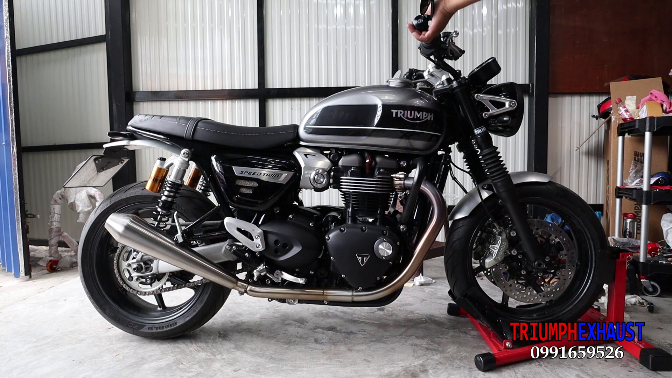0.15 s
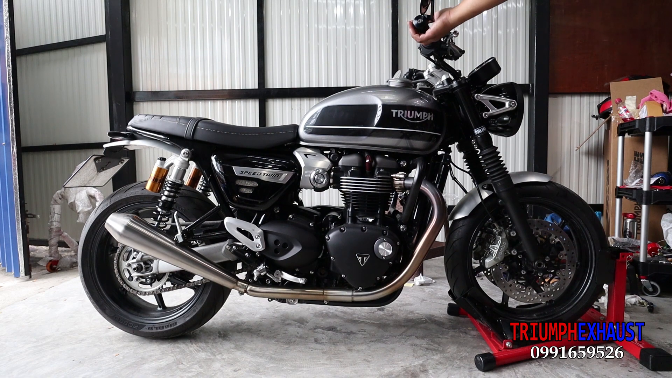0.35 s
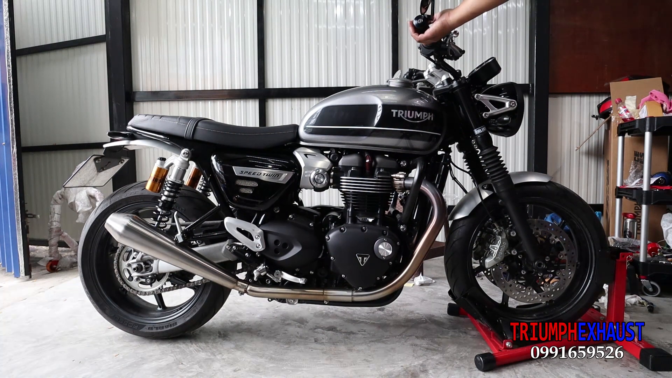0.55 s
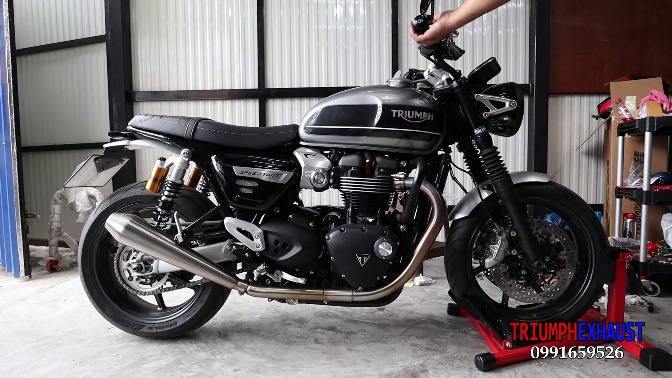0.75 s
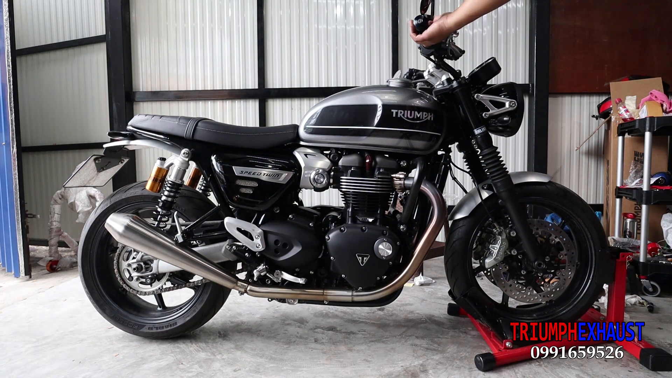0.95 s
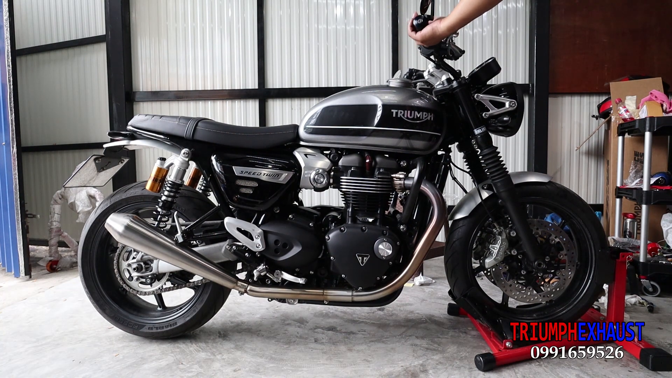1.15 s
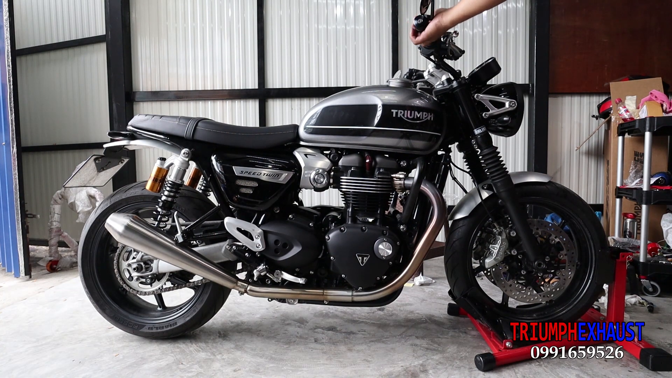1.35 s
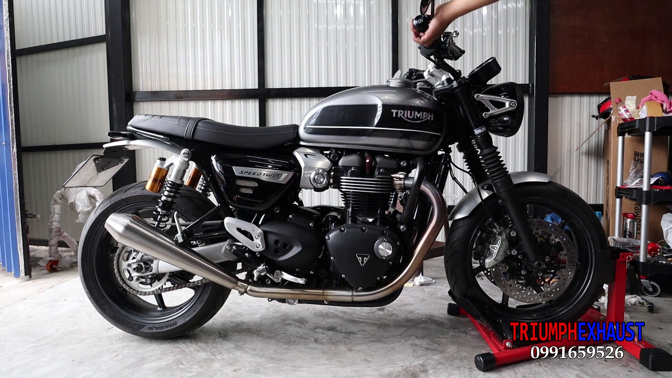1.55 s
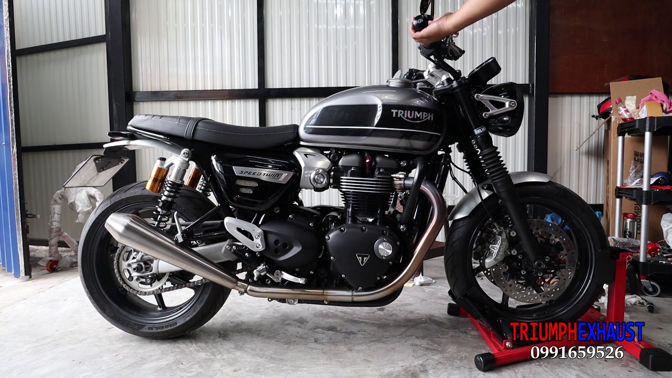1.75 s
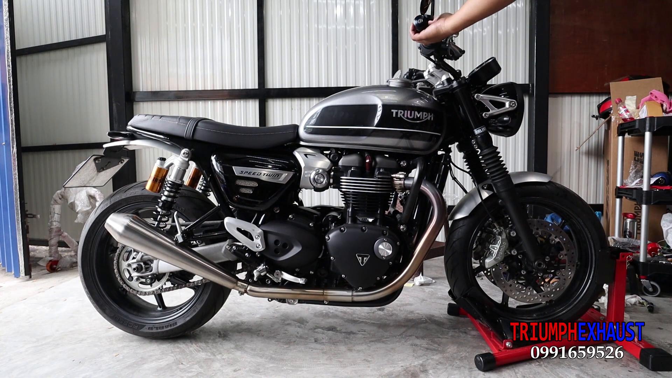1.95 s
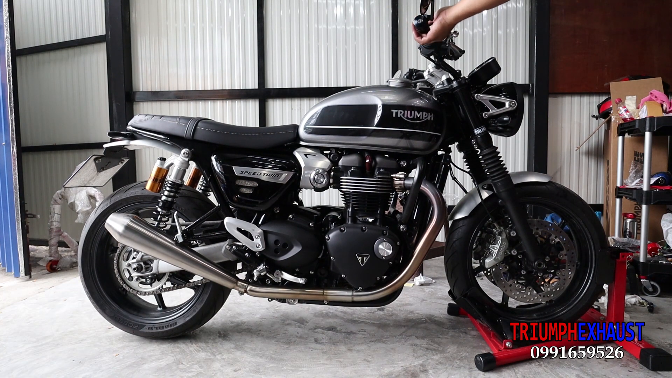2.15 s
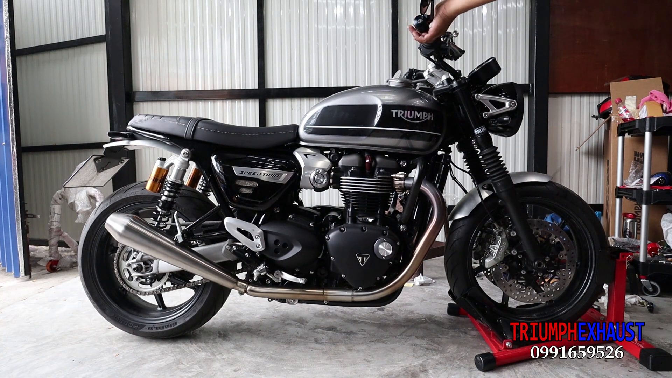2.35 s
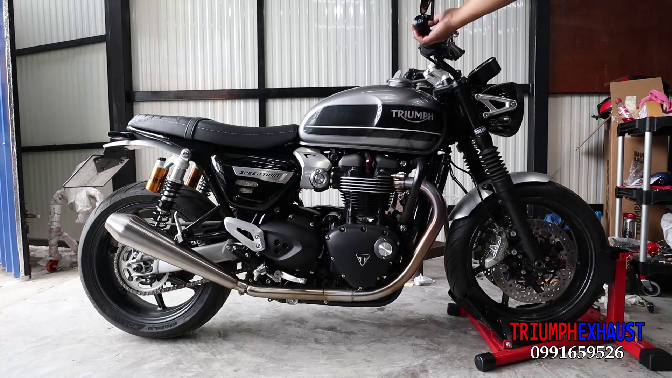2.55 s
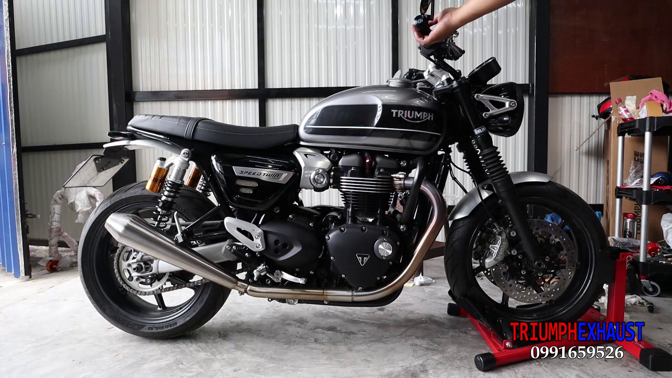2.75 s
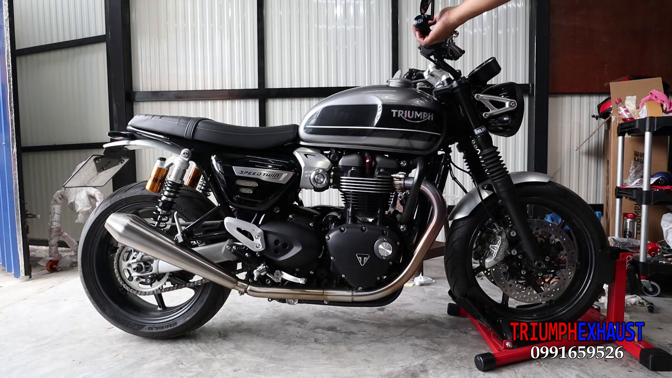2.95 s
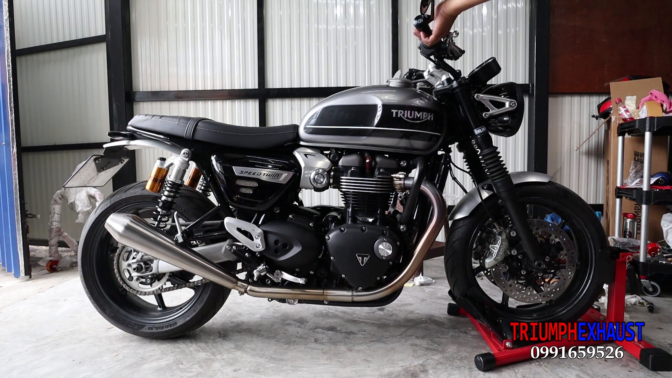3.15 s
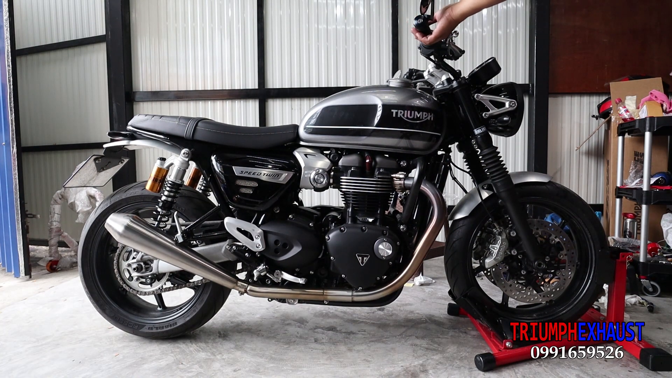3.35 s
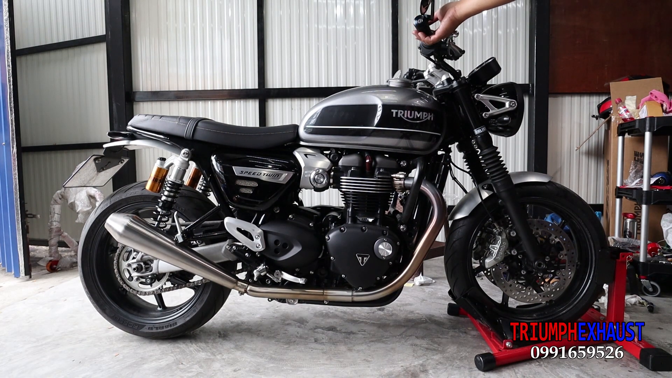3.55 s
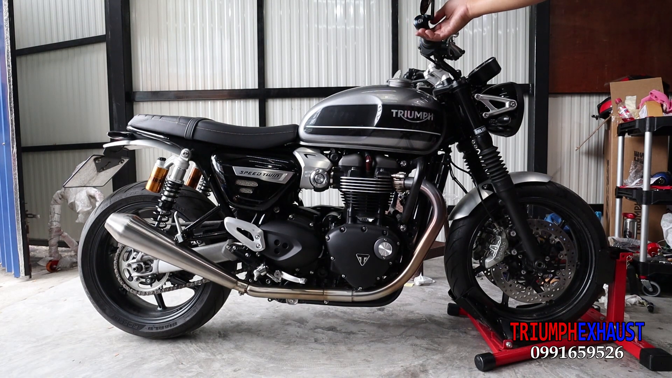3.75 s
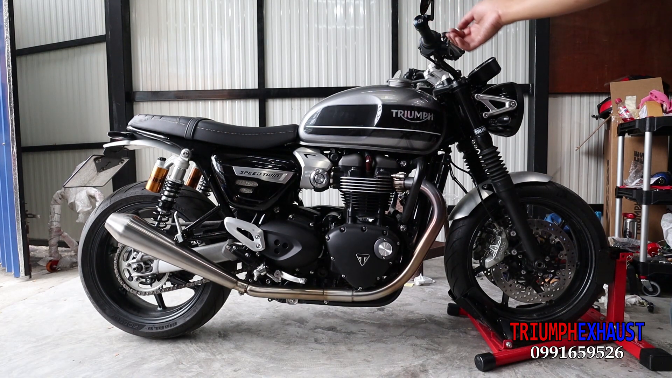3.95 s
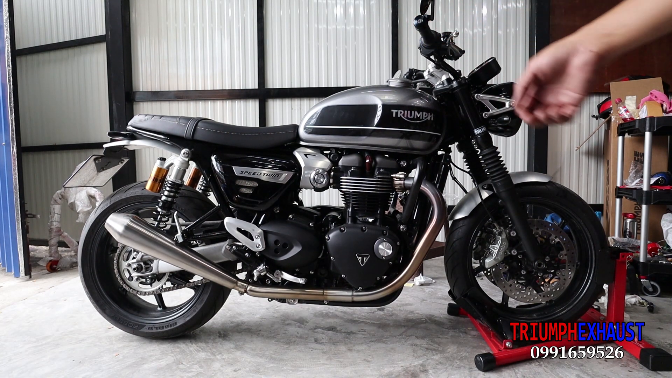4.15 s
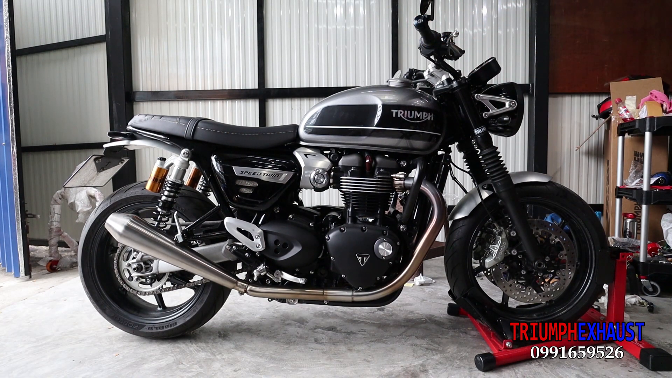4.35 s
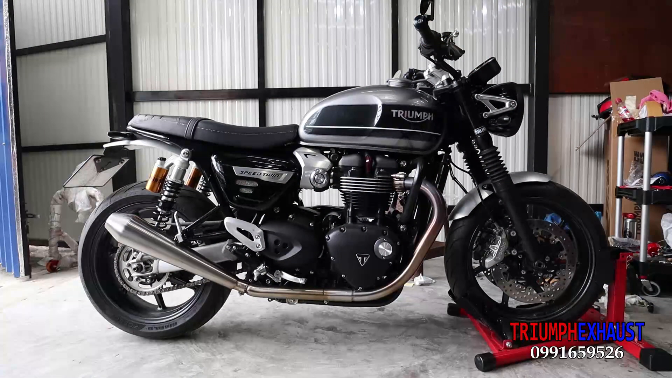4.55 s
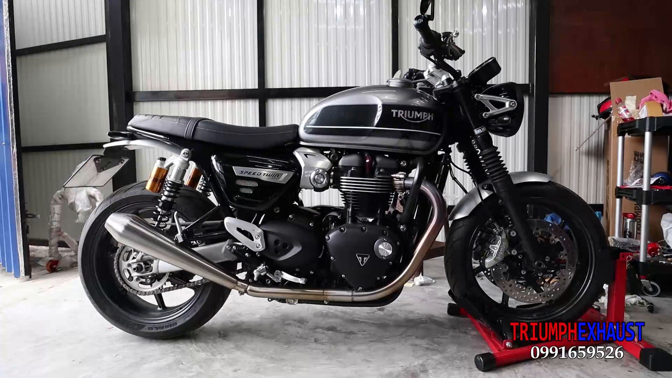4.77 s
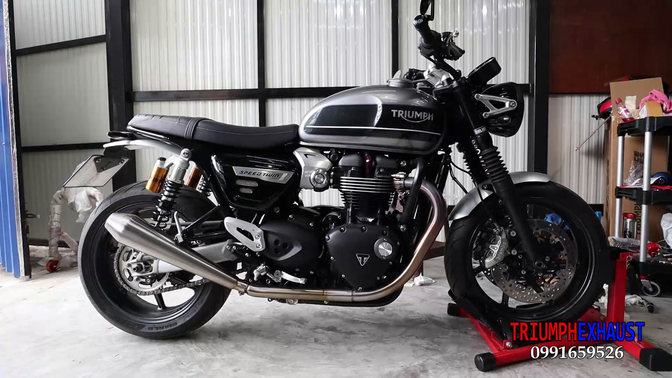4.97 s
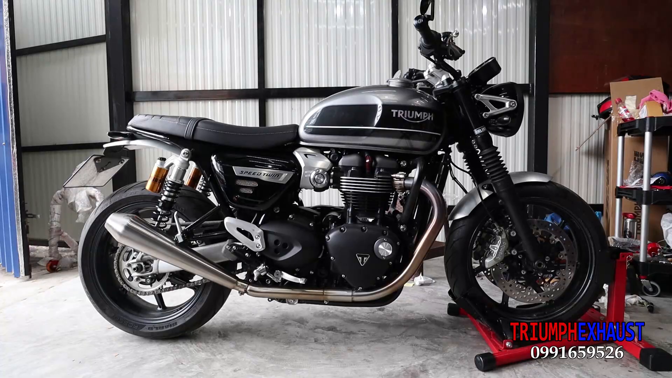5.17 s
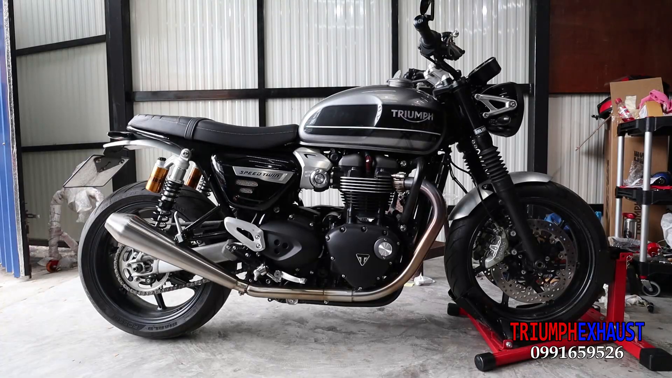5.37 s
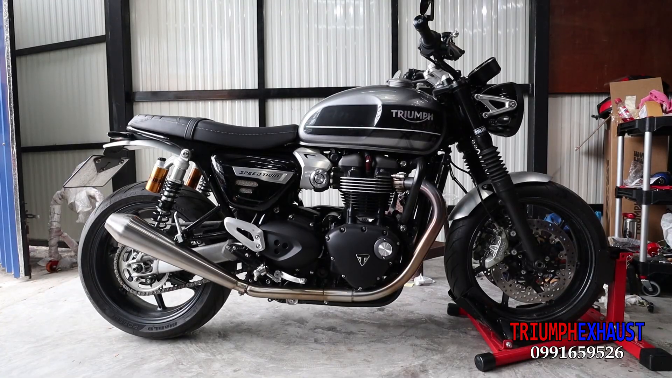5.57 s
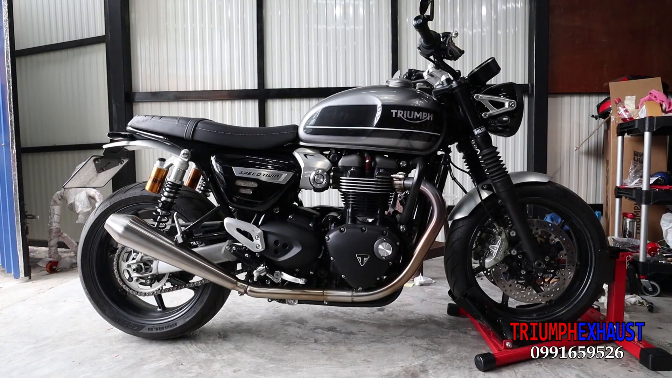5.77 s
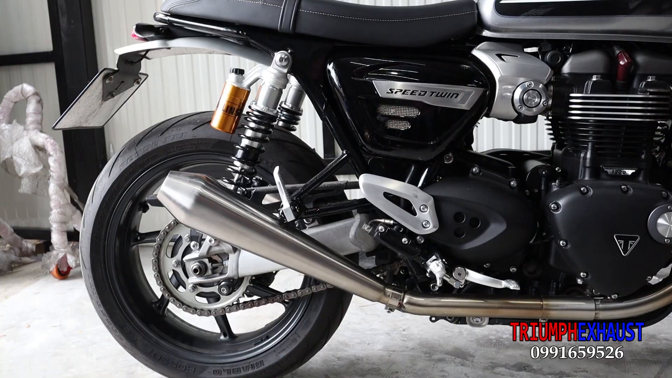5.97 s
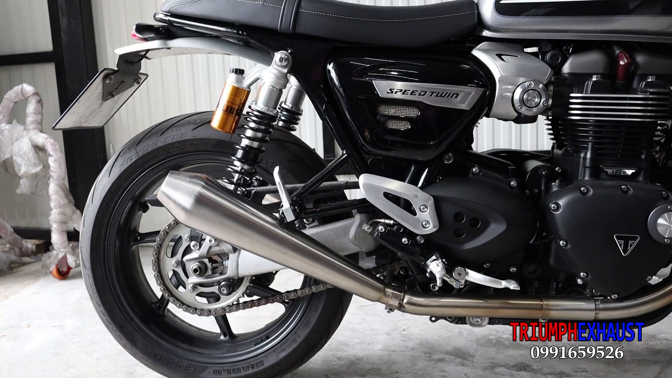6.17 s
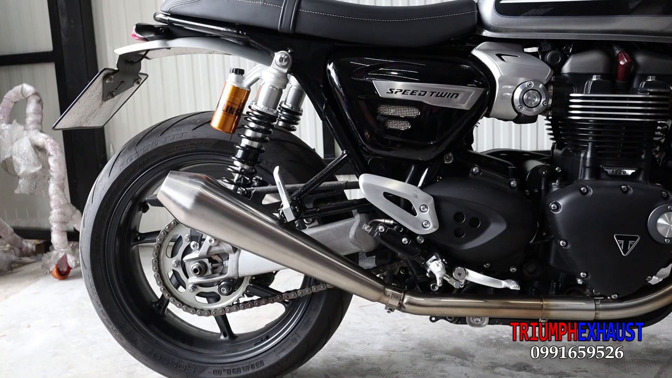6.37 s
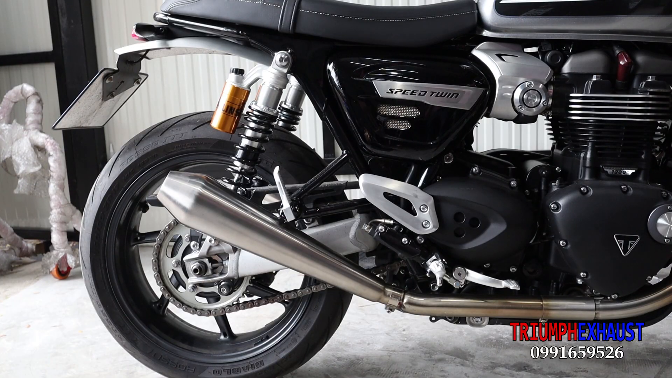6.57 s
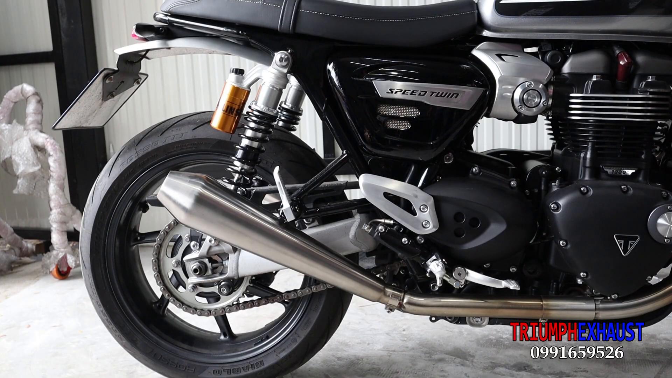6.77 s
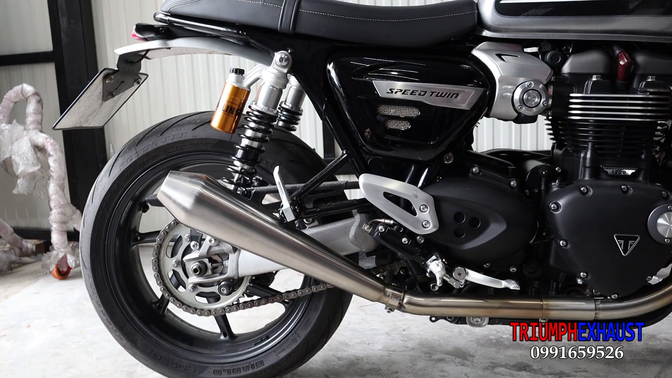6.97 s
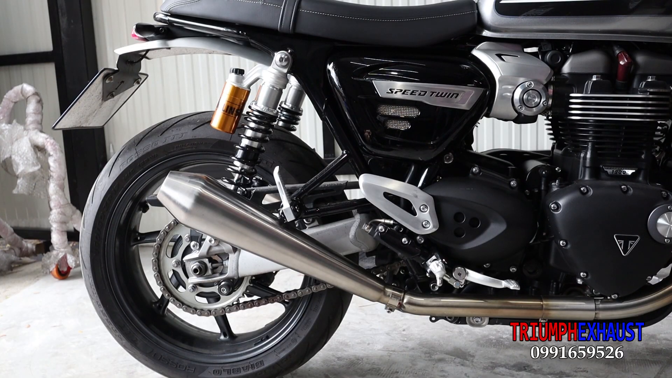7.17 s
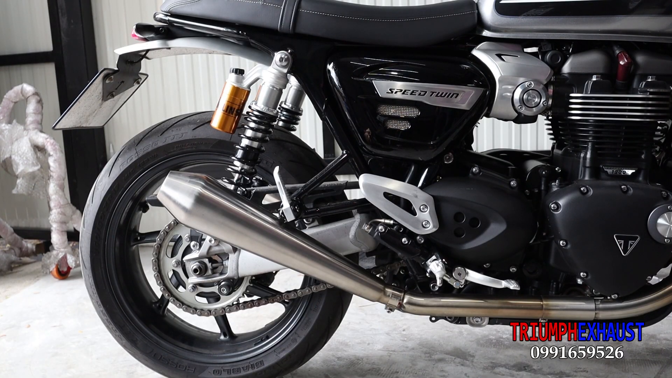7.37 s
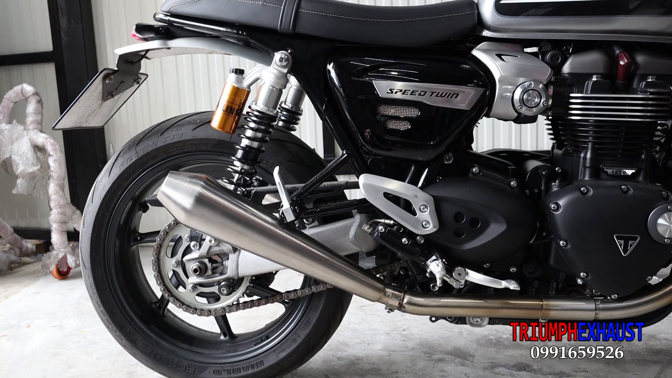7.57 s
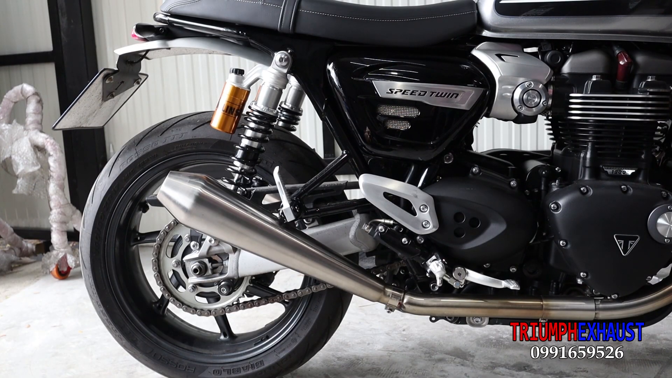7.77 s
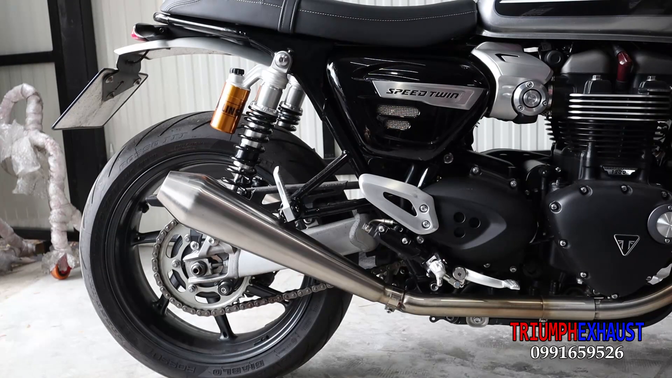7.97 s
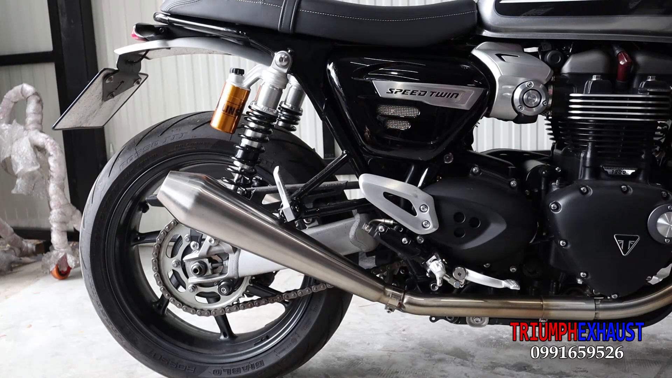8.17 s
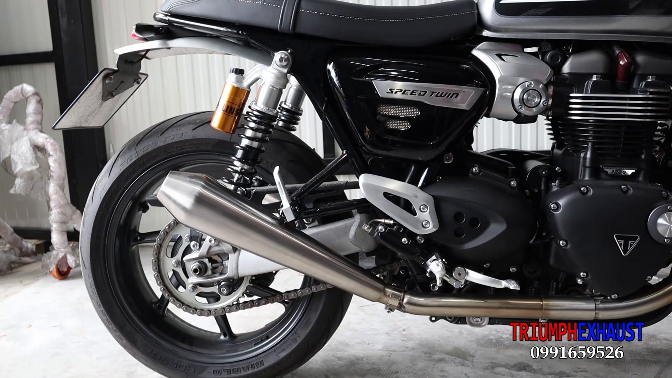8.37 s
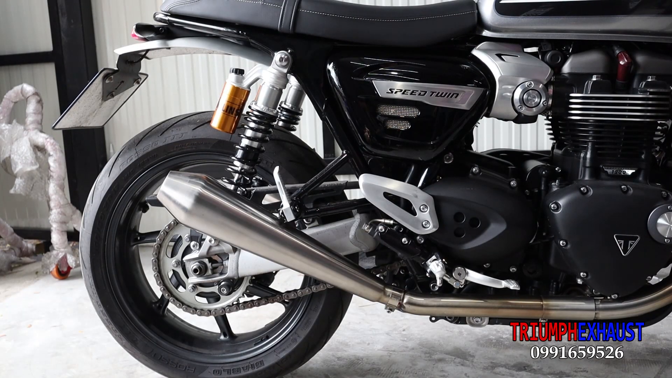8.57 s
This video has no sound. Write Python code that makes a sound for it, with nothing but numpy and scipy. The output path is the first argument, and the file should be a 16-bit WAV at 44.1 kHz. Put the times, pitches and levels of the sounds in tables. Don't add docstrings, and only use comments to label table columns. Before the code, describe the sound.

A parallel-twin motorcycle runs in a small sheet-metal workshop, dry but with a short tinny echo. It starts mid-rev, a deep, offbeat, gritty bark climbing until 0.3 s, then the throttle shuts and pitch falls; two very sharp exhaust cracks snap close together at 0.6 s, with another bang at 0.9. Further blips come at about 1.5, 2.25 and 3.15 s, each a quick rise and burbling fall, with dull pops near 2.0, 2.2, 2.95 and 3.7. From about 4.2 s it settles into a lumpy, hunting idle, stumbling briefly at 4.4, with valve clatter and a thin steady pump whine. At 5.85 s comes a blink of silence, then a closer, louder tail-pipe view: slow uneven thumping, rattling metal and clearer whine. A final blip barks from 7.7 to 8.0 s, then falls with low pops at 8.3 and 8.57, ending abruptly.

```python
import sys
import numpy as np
from scipy import signal
from scipy.fft import rfft, irfft, next_fast_len
from scipy.io import wavfile
from scipy.ndimage import uniform_filter1d

SR = 44100
rng = np.random.default_rng(int(sys.argv[2]) if len(sys.argv) > 2 else 0)


def to_linear_factor(level_db):
    exponent = np.asarray(level_db, float) / 20
    return 10 ** exponent


def generate_wav(sig):
    pcm = np.round(np.clip(np.atleast_2d(sig).T, -1, 1) * 32767).astype(np.int16)
    wavfile.write(sys.argv[1], SR, pcm)


N = 380141
T = np.arange(N) / SR

# silence_start_s, new_place_s, sound_returns_s
SCENE_CHANGE_S = (5.8405, 5.86, 5.8806)
# open_s, shut_s, pull (share of full)
TWISTS = [
    (-.085, .291, .948),
    (1.431, 1.791, .593),
    (2.22, 2.549, .684),
    (3.152, 3.3865, 1.042),
    (7.6, 8.007, .856),
]
# time_s, speed (four-stroke cycles/s)
IDLE = [(4.25, 9.51), (4.9, 9.08), (5.2, 9.34), (5.6, 8.17), (5.86, 8.96), (6.05, 8.08), (6.25, 7.66),
        (6.55, 8.62), (6.9, 8.48), (7.4, 8.76), (7.65, 7.76)]
# first_s, last_s, charge (0-1), thump_db, rush_db
BLIPS = [
    (.0, 0.296, 0.98, -13, -46.5),
    (1.499, 1.711, 0.77, -12.5, -35),
    (2.274, 2.51, 0.69, -12, -35.5),
    (3.171, 3.406, 0.66, -13.5, -37),
    (7.691, 7.954, 0.74, -18, -37.5),
]
# time_s, gain_db
GAIN = [(0, 4.5), (.2, 1), (.6, 4), (.85, -0.1), (1.4, 2.8), (1.6, 2.5), (2.3, 5.5), (2.5, 2.5), (3.2, 6),
        (3.4, 3), (4.3, 10), (5.84, 17), (5.88, 22), (7.725, 20.5), (7.77, 10.5), (7.95, 9.5), (8.2, 11.5),
        (8.62, 11)]
# pitch_hz, width_hz, gain (signed)
SHOCK_MODES = [(152.1, 25.4, 0.8), (128, 24, 0.067), (59.3, 26, -0.023), (199, 58, -0.046),
               (269.4, 27, -0.15), (312, 15, 0.088), (400.4, 17.3, -0.064), (491.4, 28, 0.046),
               (563.4, 42, -0.081), (664, 86, 0.15), (865, 85, -0.18)]
# pitch_hz, width_hz, gain (signed)
SUCTION_MODES = [(54.7, 17.6, -0.6), (121.3, 15, 0.53), (148.7, 26, 0.4), (169.4, 35.7, -0.54),
                 (262, 33.3, -0.11), (400.7, 28, 0.048), (540, 51, -0.049)]
# pitch_hz, width_hz, gain (signed)
PIPE_MODES = [(50.8, 21, -0.21), (237, 33, 0.098), (414, 90, 0.077)]
# delay_ms, gain (signed)
REFLECTIONS = [
    (0, 1),
    (9.9, -.82),
    (14.3, -.65),
    (33.3, .275),
]
# pitch_hz, level_db (per Hz)
RUSH = [(180, 0.5), (300, -7.5), (448, -10), (488, -9.5), (847, -9.5), (1110, -12), (1520, -8), (3080, -22),
        (8990, -26), (15100, -49.5), (16400, -55)]
# start_s, crack_db, thump_db (over crack), treble_db (over crack)
POPS = [
    (0.5957, 0.5, -18, -12),
    (0.6151, -3.5, -33, -16),
    (0.907, -14, 1, -31),
    (1.98, -19.5, 8.5, -21),
    (2.21, -16, 6, -35),
    (2.952, -31, 13.5, -13),
    (3.736, -19, 6, -23),
    (4.193, -29.5, 8, -23),
    (8.299, -15, 8, -24),
    (8.573, -8, 0, -36),
]
# pitch_hz, level_db (per Hz)
CRACK = [(200, -16), (400, 8.5), (900, 6), (1500, 5), (2500, -6), (4000, -37)]
# place (share of the cycle), level_db (over the whirr)
VALVES = [(.18, 0), (.55, -5), (.7, -8), (.92, -7)]
# pitch_hz, level_db (per Hz)
CLATTER = [(180, 1.5), (300, -0.5), (400, -11.5), (876, -7), (1200, -6.5), (1420, -4.5), (1580, -6),
           (1760, -4.5), (2000, -11), (3000, -13), (4000, -15), (4500, -22.5), (8800, -28), (15100, -46.5),
           (16400, -68)]
# pitch_hz, level_db (per Hz)
CASING = [(900, -9), (1300, -4), (1500, 5.5), (1700, -24), (2100, -42), (2600, -10), (3300, -43),
          (3850, -5), (4200, -32)]
PUMP_ORDERS_DB = [0, -10.5, -10.5, -13, -23]

START_FAR, START_NEAR, START_SPEED = .303, .285, 21.072
SECOND_CYLINDER = 270 / 720
PULL, DRAG, FRICTION_PER_S = 97.317, 13.207, .349
TWIST_S, SHUT_S, MANIFOLD_S = .085, .05, .033
LEAVES_IDLE_S, CONTROL_HZ = 7.65, 1000

FILL_S, EMPTY_S, RUSH_TAIL_S = .13, 0.053, 0.032
IDLE_CHARGE, COAST_CHARGE, GOVERNOR_SPEED = 0.21, 0.033, 16
IDLE_DB, IDLE_DB_PER_OCTAVE = -31.5, 11
COAST_DB, COAST_DB_PER_OCTAVE = -24, 12.5
CLATTER_DB, CLATTER_DB_PER_OCTAVE, CLATTER_LOAD_DB = -39, 6.5, 2
RUSH_DB, RUSH_DB_PER_OCTAVE = -50, 8
STUMBLE_S, STUMBLE_LENGTH_S, STUMBLE_DB = 4.4, 0.067, -26

SILENCER_HZ, SILENCER_WIDTH_HZ = 130.1, 43.2
WALL_MS, WALL_GAIN = 33.3, 0.12
CLOSING_SHARE = .25
CLOSING_GAIN, CLOSING_FROM_SPEED = 0.68, 16
BARK_LATE_S, BARK_DB = .002, -6.5

PUMP_HZ, PUMP_DB = 1060.3, -53.5
SHED_T60_S, SHED_DB = 0.36, -5.5


def curve(rows, column=1):
    rows = np.array(rows, float)
    return np.interp(T, rows[:, 0], rows[:, column])


def unit(x):
    return x / np.sqrt(np.mean(x ** 2))


def colour(x, spectrum, lo_hz=20, hi_hz=20000):
    size = next_fast_len(len(x))
    hz = np.arange(size // 2 + 1) * SR / size + 1
    points_hz, points_db = np.array(spectrum).T
    gain = to_linear_factor(np.interp(np.log(hz), np.log(points_hz), points_db))
    band = (hz > lo_hz) & (hz < hi_hz)
    gain /= np.sqrt(np.sum(gain[band] ** 2) / len(hz))
    return irfft(rfft(x, size) * gain, size)[:len(x)]


def walk(rate_hz):
    size = int(SR / rate_hz)
    steps = np.repeat(rng.standard_normal(N // size + 1), size)
    return uniform_filter1d(uniform_filter1d(steps, size), size)[:N]


def through(x, response):
    return signal.fftconvolve(x, response)[:N]


def decay(t60_s):
    t = np.arange(int(t60_s * SR)) / SR
    return np.exp(-np.log(1000) * t / t60_s)


def lag(x, loss_per_s, start):
    return signal.lfilter([1 / CONTROL_HZ], [1, loss_per_s / CONTROL_HZ - 1], x, zi=[start])[0]


def crank_speed():
    t = np.arange(0, T[-1], 1 / CONTROL_HZ)
    grip = 0
    for open_s, shut_s, share in TWISTS:
        opening = np.clip((t - open_s) / TWIST_S, 0, 1)
        grip = grip + share * opening * np.clip((shut_s - t) / SHUT_S, 0, 1)
    push = PULL * lag(grip, 1 / MANIFOLD_S, 0) / MANIFOLD_S - DRAG
    idle = np.interp(t, *np.array(IDLE).T)
    k = int(LEAVES_IDLE_S * CONTROL_HZ)
    before = lag(push[:k], FRICTION_PER_S, START_SPEED)
    after = lag(push[k:], FRICTION_PER_S, idle[k])
    return np.interp(T, t, np.maximum(np.r_[before, after], idle))


def engine_state(speed):
    octaves = np.log2(speed / 20)
    idling = np.clip((GOVERNOR_SPEED - speed) / 6.4, 0, 1)
    charge = COAST_CHARGE + (IDLE_CHARGE - COAST_CHARGE) * idling
    idle_db = IDLE_DB + IDLE_DB_PER_OCTAVE * np.log2(speed / 8.63)
    coast_db = COAST_DB + COAST_DB_PER_OCTAVE * octaves
    thump_db = idling * idle_db + (1 - idling) * coast_db
    thump_db += STUMBLE_DB * np.clip(1 - abs(T - STUMBLE_S) / STUMBLE_LENGTH_S, 0, 1)
    rush_db = RUSH_DB + RUSH_DB_PER_OCTAVE * octaves
    load = 0
    for first, last, full, blip_db, gas_db in BLIPS:
        fill = np.clip((T - first) / FILL_S, 0, 1)
        on = fill * np.clip((last - T) / EMPTY_S, 0, 1)
        gas = fill * np.clip(1 + (last - T) / RUSH_TAIL_S, 0, 1)
        charge = charge + on * (full - charge)
        thump_db = thump_db + np.sqrt(on) * (blip_db - thump_db)
        rush_db = rush_db + gas * (gas_db - rush_db)
        load = load + gas
    clatter_db = CLATTER_DB + CLATTER_DB_PER_OCTAVE * octaves + CLATTER_LOAD_DB * load
    return charge, thump_db, clatter_db, rush_db


def strokes(crank, share, scatter_db):
    at = np.flatnonzero(np.diff(np.floor(crank - share)) == 1)
    out = np.zeros(N)
    out[at] = to_linear_factor(scatter_db * rng.standard_normal(400)[:len(at)])
    return out


def ringing(modes, t):
    return sum(g * np.exp(-np.pi * w * t) * np.sin(2 * np.pi * hz * t) for hz, w, g in modes)


def pipe():
    t = np.arange(int(.25 * SR)) / SR
    swell = 500 * t * np.exp(-np.pi * SILENCER_WIDTH_HZ * t)
    ring = swell * np.sin(2 * np.pi * SILENCER_HZ * t) + ringing(PIPE_MODES, t)
    out = sum(g * np.pad(ring, (int(ms * SR / 1000), 0))[:len(t)] for ms, g in REFLECTIONS)
    return out / np.sqrt(np.sum(out ** 2) / SR)


def struck(modes):
    t = np.arange(int(.2 * SR)) / SR
    ring = ringing(modes, t) * (1 - np.exp(-t / .003))
    ring = ring + WALL_GAIN * np.pad(ring, (int(WALL_MS * SR / 1000), 0))[:len(t)]
    return ring / np.sqrt(np.sum(ring ** 2) / SR)


def exhaust(crank, speed, charge, thump_db, rush_db):
    opens = strokes(crank, 0, 0.43) + to_linear_factor(1.85) * strokes(crank, SECOND_CYLINDER, 1)
    burn = np.clip(charge / 0.26, 0, 1)
    shock = np.clip((charge - .2) / .5, 0, 1)
    size = to_linear_factor(thump_db) / np.sqrt(2 * speed)
    push = opens * size
    thump = through(push * burn * (1 - shock), pipe()) + through(push * shock, struck(SHOCK_MODES))

    shuts = strokes(crank, CLOSING_SHARE, 1) + strokes(crank, SECOND_CYLINDER + CLOSING_SHARE, 1)
    push = push + shuts * size * CLOSING_GAIN * np.clip((speed - CLOSING_FROM_SPEED) / 11.7, 0, 1)
    suction = through(push * (1 - burn), struck(SUCTION_MODES))
    thump -= np.roll(suction, -int(0.0031 * SR))

    late = np.roll(opens, int(BARK_LATE_S * SR))
    gate = 0.41 + 1.8 * shock * through(late, decay(0.029))
    rush = colour(gate * rng.standard_normal(N), RUSH, 4730, 15000)
    return thump + (0.3 + 0.76 * shock) * to_linear_factor(rush_db) * rush


def bark(crank, speed, charge, thump_db):
    opens = strokes(crank, 0, 1.4) + strokes(crank, SECOND_CYLINDER, 0.85)
    late = np.roll(opens, int(BARK_LATE_S * SR))
    force = (speed / 21) ** 1.1 * np.clip((charge - .4) / .5, 0, 1)
    snap = through(late * force * to_linear_factor(thump_db + BARK_DB), decay(0.0067))
    return colour(snap * (1 + rng.standard_normal(N)),
                  [(200, -26), (450, -1), (800, 14.5), (1700, -4.5), (3000, -4), (8000, -26.5), (15000, -38)])


def afterfire():
    thump, crack, tick = np.zeros((3, N))
    for s, db, low_db, high_db in POPS:
        k = int(s * SR)
        thump[k] = to_linear_factor(db + low_db - 18)
        crack[k] = to_linear_factor(db)
        tick[k] = to_linear_factor(db + high_db)
    tail = to_linear_factor(-7) * decay(0.12)
    tail[:int(.025 * SR)] += decay(.025) ** 1.47
    grit = colour(through(crack, tail) * rng.standard_normal(N), CRACK)
    snap = colour(through(tick, decay(0.0023)) * rng.standard_normal(N), RUSH, 3000, 10000)
    return through(thump, struck(SHOCK_MODES)) + to_linear_factor(-7) * grit + to_linear_factor(-5) * snap


def valve_gear(crank, speed, clatter_db):
    swell = 1
    for share, db in VALVES:
        swell = swell + through(strokes(crank, share, 1.5) * to_linear_factor(db), decay(0.07))
    ticks = (rng.random(N) < 600 / SR) * rng.standard_normal(N) * 3
    flicker = to_linear_factor(walk(40))
    whirr = unit(swell * flicker * (rng.standard_normal(N) + ticks))
    ring = (speed / 30) ** 2.9 * to_linear_factor(-11.5) * colour(whirr, CASING, 900, 5700)
    return to_linear_factor(clatter_db - 0.36) * (colour(whirr, CLATTER, 580, 6000) + ring)


def fuel_pump():
    turn = 2 * np.pi * np.cumsum(PUMP_HZ * (1 + 0.000738 * walk(3))) / SR
    tone = sum(to_linear_factor(db) * np.sin((k + 1) * turn) for k, db in enumerate(PUMP_ORDERS_DB))
    return to_linear_factor(curve(GAIN) + PUMP_DB) * tone


def tin_walls(bike):
    walls = decay(SHED_T60_S) * rng.standard_normal(int(SHED_T60_S * SR))
    walls = np.pad(walls / np.sqrt(np.sum(walls ** 2)), (int(.02 * SR), 0))
    wet = colour(through(bike, walls), [(150, -19), (400, -8), (3000, -12.5), (12000, -8.5)])
    return to_linear_factor(SHED_DB) * wet


def scene():
    near = T >= SCENE_CHANGE_S[1]
    speed = crank_speed()
    turns = np.cumsum(speed) / SR
    crank = np.where(near, turns - turns[np.argmax(near)] + START_NEAR, turns + START_FAR)
    charge, *levels = engine_state(speed)
    thump_db, clatter_db, rush_db = (db + curve(GAIN) for db in levels)
    bike = exhaust(crank, speed, charge, thump_db, rush_db)
    bike = bike + bark(crank, speed, charge, thump_db) + afterfire()
    metal = valve_gear(crank, speed, clatter_db) + fuel_pump()
    return (bike + tin_walls(bike) + metal)[None]


def band_limit(x):
    return signal.sosfilt(signal.butter(12, 16580, fs=SR, output="sos"), x)


def record(dry):
    gap = (T > SCENE_CHANGE_S[0]) & (T < SCENE_CHANGE_S[2])
    heard = colour(dry[0], [(25, -47), (40, -7.0), (55, -0.5), (20000, 1.5)])[None]
    clipped = np.clip(heard * ~gap, -1, 1)
    top = signal.ellip(8, .1, 60, 16300, fs=SR, output="sos")
    return band_limit(signal.sosfilt(top, clipped))


dry = scene()
out = record(dry)
generate_wav(out)
```